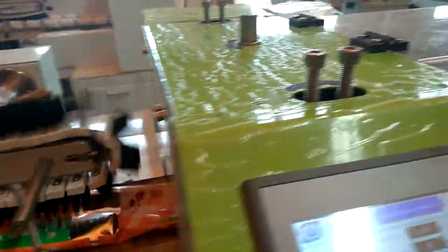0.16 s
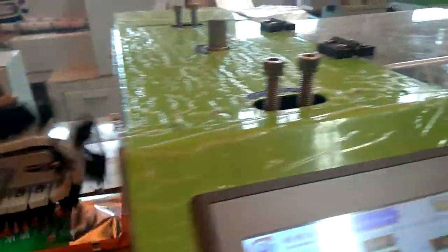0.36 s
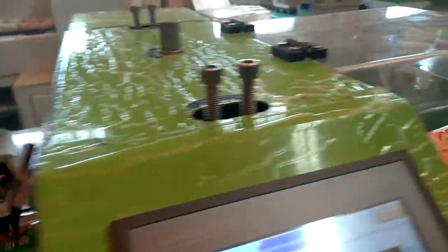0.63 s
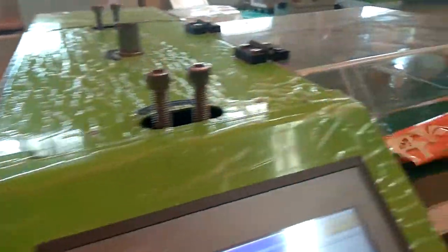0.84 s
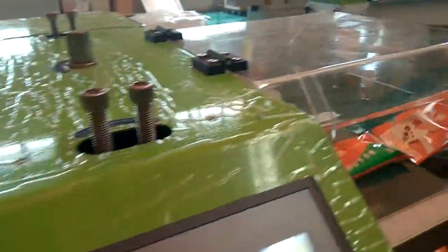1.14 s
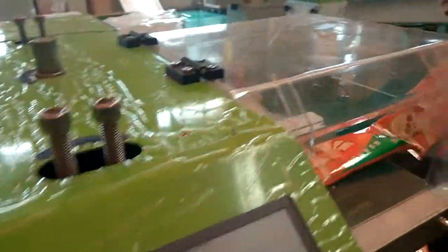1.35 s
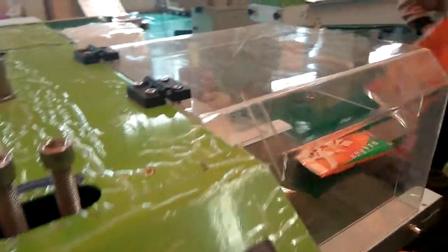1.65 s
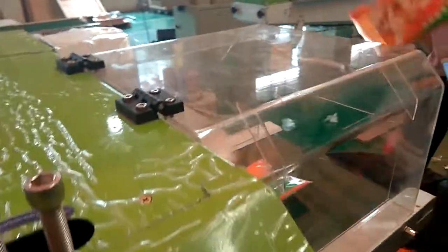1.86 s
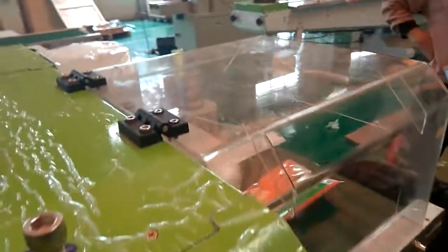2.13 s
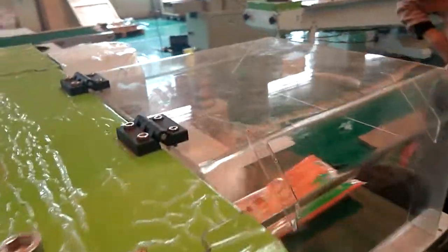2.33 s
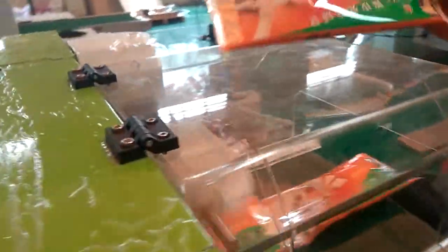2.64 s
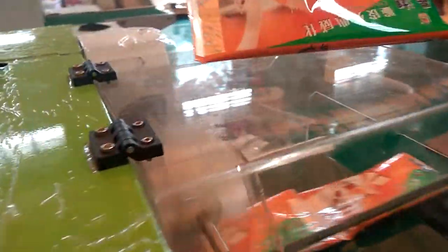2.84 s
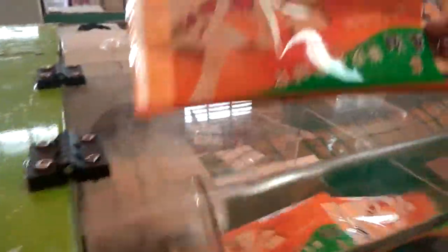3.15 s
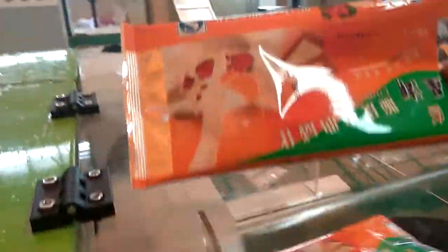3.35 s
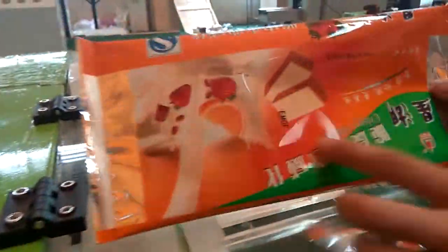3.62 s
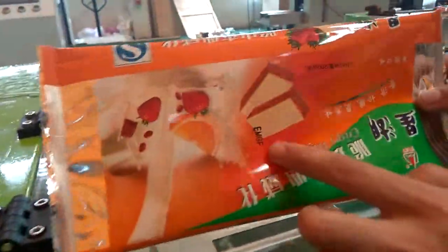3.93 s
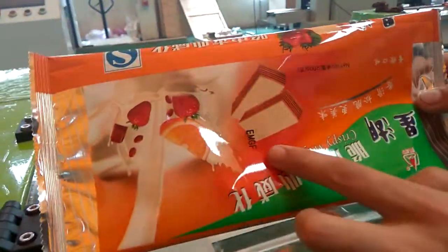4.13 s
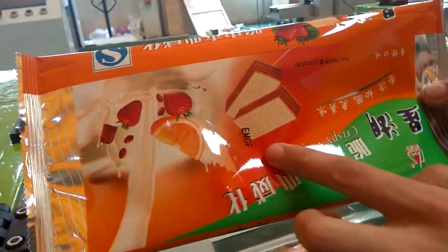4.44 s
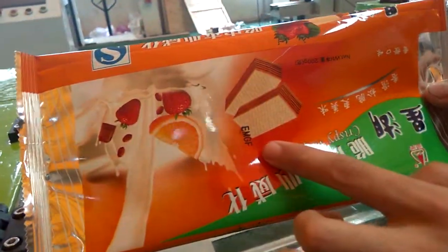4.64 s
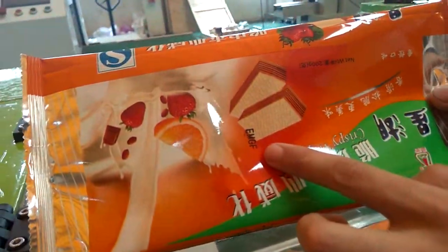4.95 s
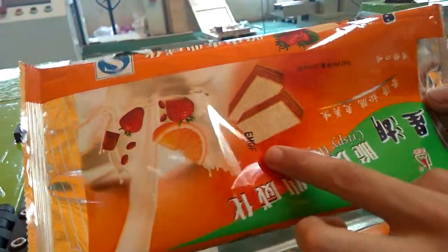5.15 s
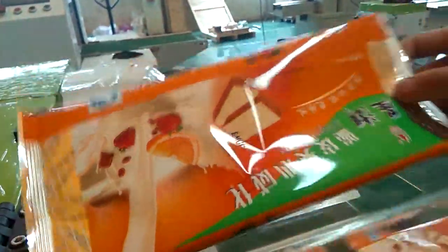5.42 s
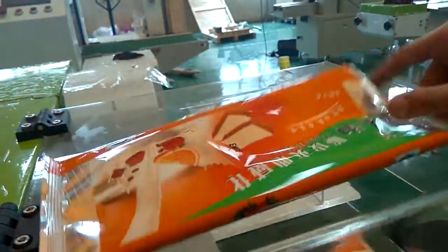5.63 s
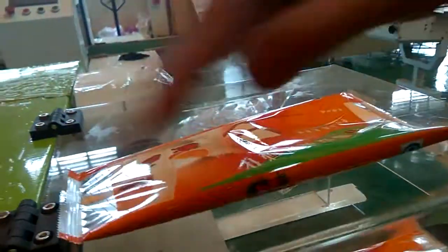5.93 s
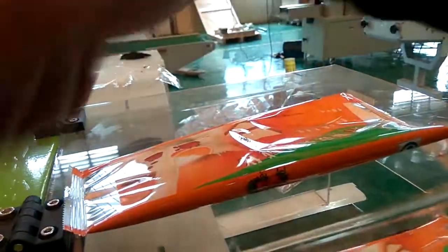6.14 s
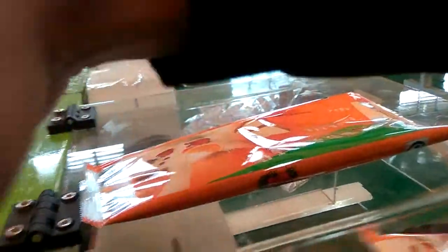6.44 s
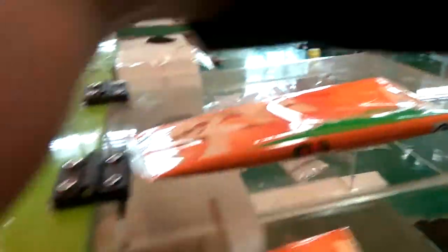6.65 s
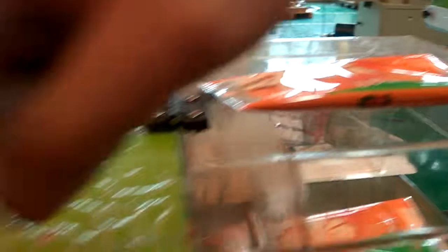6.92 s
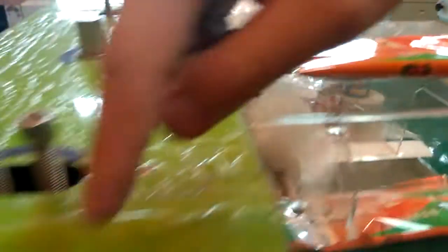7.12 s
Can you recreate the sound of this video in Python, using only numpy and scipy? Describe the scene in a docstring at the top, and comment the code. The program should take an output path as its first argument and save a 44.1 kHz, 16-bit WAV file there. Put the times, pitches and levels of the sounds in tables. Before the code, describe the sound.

A packaging machine runs throughout, close to a handheld stereo microphone in a reverberant factory hall. Jaw knocks, short and hollow with a brief grind, fall near 0.1, 1.3, 2.5, 3.7, 4.9 and 6.1 seconds. Each is followed about a tenth of a second later by a bright, scraping steel clack, strongest near 0.2, 1.4, 2.6, 3.8 and 6.2; further cam clatter fills every cycle. A low frame groan around 185 hertz wavers and flutters over rumble, briefly after the knock, then longer and stronger about half a second later. Chain links and film rustle constantly, ticking densely, busiest in the first second, thinner around 3 and 4, fuller again at the end. A loose plate rings thin rough notes, notably near 0.9, 4.5, 5.3, 5.8 and 6.9. Balance starts centred or slightly left, then mostly leans right. The machine is still running at the end.

```python
"""Packaging machine in a factory hall

A packaging machine runs close to a hand-held camera, one pack about every 1.2 s, nearer to the right microphone.
The drive makes the frame groan twice a cycle (wavering sines over low noise) and the chain rustles (patchy noise).
The jaws knock (noise and a pulse through resonances), cams and links clatter (scrapes and ringing steel modes),
a guide plate sings three rough notes, and the hall smears all the blows into a hiss (decaying noise)."""
import sys
import numpy as np
from scipy import signal
from scipy.fft import rfft, irfft, next_fast_len
from scipy.io import wavfile
from scipy.ndimage import uniform_filter1d, map_coordinates

SR = 44100
rng = np.random.default_rng(int(sys.argv[2]) if len(sys.argv) > 2 else 0)


def store_pcm(level_fs):
    """Save levels as 16-bit WAV."""
    pcm = np.round(np.clip(level_fs, -1, 1) * 32767).astype(np.int16)
    wavfile.write(sys.argv[1], SR, np.atleast_2d(pcm).T)


N = 321048
LAG = 19  # samples by which the treble, the knocks and the ringing steel come late on the left
LEFT_RIGHT = np.array([[.5], [-.5]])  # splits a left-right difference in dB between the two sides


def amp(db):
    """Turns decibels into a factor."""
    return 10 ** (np.asarray(db) / 20)


def unit(x):
    """Scales a sound to an average (RMS) level of one."""
    return x / np.sqrt(np.mean(x ** 2, axis=-1, keepdims=True) + 1e-20)


def along(points, hz):
    """Reads a curve of (Hz, value) points on a logarithmic frequency axis."""
    f, v = np.transpose(points)
    return np.interp(np.log(hz + 1), np.log(f + 1), v)


def curves(rows):
    """Gives one value per sample for each column after the time."""
    s, *cols = np.transpose(rows)
    return [np.interp(np.arange(N) / SR, s, c) for c in cols]


FIRST_S, PACK_S = .071, 1.199  # first jaw blow and length of a cycle, in seconds


def in_cycle(s):
    """Seconds since the last jaw blow."""
    return (s - FIRST_S) % PACK_S


def cycle(rows):
    """Like curves, for rows that repeat every cycle."""
    s, *cols = np.transpose(rows)
    return [np.interp(in_cycle(np.arange(N) / SR), s, c, period=PACK_S) for c in cols]


def wobble(rate):
    """Draws a smooth random curve through a given number of random points a second."""
    knots = rng.standard_normal(int(N * rate / SR) + 4)
    return map_coordinates(knots, [np.arange(N) * rate / SR])


def filtered(x, response):
    """Filters x by a complex response of frequency."""
    m = next_fast_len(x.shape[-1] + 2048)
    spectrum = rfft(x, m) * response(np.fft.rfftfreq(m, 1 / SR))
    return irfft(spectrum, m)[..., :x.shape[-1]]


# How much the two microphones hear the same thing.
# Each row: frequency in Hz, left-right likeness from 0 to 1.
ALIKE = [(30, 0.85), (150, 0.97), (300, 0.86), (600, 0.68), (1200, 0.53), (5000, 0.13)]


def pair(noise, colour_db, direct=1):
    """Turns two noises into a coloured left and right, partly alike, with the treble late on the left."""
    def mix(hz):
        likeness = np.clip(along(ALIKE, hz), 0, 1) ** direct  # direct below 1 makes the sides more alike
        angle = np.arccos(likeness) / 2
        return amp(colour_db(hz)) * np.array([np.cos(angle), np.sin(angle)])

    def late(hz):
        share = np.clip(hz / 900 - .6, 0, 1)  # no delay in the bass, the full delay in the treble
        return np.exp(-2j * np.pi * hz * LAG / SR * share)

    mid, side = np.moveaxis(filtered(noise, mix), -2, 0)
    return unit(np.stack([filtered(mid + side, late), mid - side], axis=-2))


def late_left(sound):
    """Plays one sound on both sides, the left one late."""
    return np.array([np.roll(sound, LAG), sound])


def add(track, s, sound):
    """Mixes a short sound into the track at s seconds."""
    part = track[..., round(s * SR):][..., :sound.shape[-1]]
    part += sound[..., :part.shape[-1]]


def ring(modes, t, extra_db):
    """Sums decaying modes, each with its own strength and a random phase."""
    hz, db, t60 = np.transpose(modes)[..., None]
    phase = rng.uniform(0, 2 * np.pi, hz.shape)
    return np.sum(amp(db + extra_db - 60 * t / t60) * np.sin(2 * np.pi * hz * t + phase), axis=0)


# The drive over one cycle, a short stroke and a long one; levels are before a fixed trim.
# Each row: seconds after the jaw blow, groan pitch in Hz, groan level in dB, casing rumble level in dB.
DRIVE = [(0, 187, -32, -35.5), (.03, 186.3, -23, -29.5), (.075, 180.7, -18, -30),
         (.145, 183.2, -20.5, -34.5), (.235, 189.2, -28, -35.5), (.36, 174.7, -41, -42.5),
         (.42, 181.6, -29, -35), (.475, 189, -25.5, -37), (.505, 184.1, -14.5, -27),
         (.555, 171.7, -15, -26), (.645, 186, -13, -29), (.70, 187.9, -18.5, -28),
         (.755, 188.8, -22.5, -34.5), (.80, 187.7, -34, -33.5), (.9, 174, -38.5, -38.5),
         (1.0, 186.3, -35.5, -37), (1.05, 178, -46.5, -40.5), (1.17, 185.6, -37, -39)]
# Two close frame modes beat, so the groan dips.
# Each row: seconds after the jaw blow, depth from 0 to 1.
DIPS = [(.115, 1), (0.201, 1), (.265, 0.9), (0.456, 0.5), (0.531, .6), (0.607, .75)]
DIP_S = .014  # seconds from the middle of a dip to about a third of its depth
# The colour of the casing rumble.
# Each row: frequency in Hz, relative level in dB.
CASING = [(15, -72.5), (25, -59), (54, -48.5), (79, -27), (135, -10.5), (179, 12), (249, -12.5),
          (323, -13.5), (405, -20), (544, -22.5), (706, -30.5), (812, -33), (1600, -36), (2080, -48.5),
          (3520, -120)]


def drive():
    """Gear teeth shake the frame: a wavering groan, every second tooth stronger, over casing rumble."""
    hz, groan_db, rumble_db = cycle(DRIVE)
    turn = 2 * np.pi * np.cumsum(hz + 6 * wobble(30)) / SR
    t = in_cycle(np.arange(N) / SR)
    beat = amp(1.53 * wobble(25))
    for s, depth in DIPS:
        beat = beat * (1 - depth * np.exp(-((t - s) / DIP_S) ** 2))
    second_tooth = amp(-21) * np.sin(turn / 2)
    uneven_teeth = amp(-18) * np.sin(1.7 * turn)
    groan = unit(beat * np.sin(turn) + second_tooth + uneven_teeth)

    def colour(f):
        gap_db = 20 * np.exp(-((f - 185) / 30) ** 2)  # leaves room for the groan
        return along(CASING, f) - gap_db

    rumble = pair(rng.standard_normal((2, N)), colour)
    rumble_level = amp(rumble_db + 3.5 + 1.83 * wobble(20))
    return amp(groan_db - 4.5) * groan + rumble_level * rumble


# The running noise of chain and film.
# Each row: time in seconds, level in dB before the load on the drive and a trim are added.
RUNNING = [(0.0, -36), (0.34, -33.5), (1.01, -37.5), (1.86, -37.5), (2.94, -43.5), (3.08, -38), (3.73, -35),
           (3.95, -45), (4.46, -39), (4.66, -41), (6.04, -37), (6.43, -40), (6.77, -38), (7.28, -32)]
RUNNING_FOLLOWS = 0.25  # dB of running noise per dB of casing rumble


def running_db():
    """The running noise swells a little with the load on the drive."""
    rumble_db = cycle(DRIVE)[-1]
    return curves(RUNNING)[0] + RUNNING_FOLLOWS * (rumble_db - rumble_db.mean())


# The balance as the camera turns; the rustle takes only part of the chain links' balance.
# Each row: time in seconds, left-right difference in dB of the cams, the same of the chain links,
# level in dB of the faint ticks over the running noise.
TURN = [(0, -3.5, 0, 7.5), (1.001, 1.5, -1.5, 6.5), (1.45, 0, -1, 16.5), (1.65, 10, 9, 9),
        (1.85, -2, 8, 7.5), (2.3, 8, 9.5, 8.5), (2.6, 0, 5, 12), (3.2, 3.5, 3.5, 2.5), (4.2, 2.5, 6.5, 3),
        (5.401, 3.5, 4.5, 10), (6.2, 2, 7, 4), (7.28, 3.5, 4, 1)]
# The colour of the chain rustle.
# Each row: frequency in Hz, relative level in dB.
CHAIN = [(530, 3), (900, 2), (1540, -4), (2670, 0), (3570, -3), (4530, -5.5), (5530, 0), (6820, -10.5),
         (7390, -26), (8000, -31.5), (8930, -26.5), (9480, -27), (9770, -53.5), (12700, -76.5),
         (21500, -120)]


def chain():
    """Links, rollers and film rustle: a patchy hiss that throbs with many small unseen ticks."""
    ticks = (rng.random(N) < 140 / SR) * rng.uniform(0, 1, N) ** 2  # about 140 a second
    tick_decay = amp(-60 * np.arange(1500) / SR / 0.065)
    throb = 1 + 0.5 * signal.fftconvolve(ticks, tick_decay)[:N]
    # brief ringing of small parts: patches of the spectrum swell and fade
    z = signal.stft(rng.standard_normal((2, N)), nperseg=256)[2]
    patches = uniform_filter1d(rng.standard_normal(z.shape[1:]), size=2, axis=0)
    patches = uniform_filter1d(patches, size=8, axis=1)
    noise = signal.istft(z * amp(3 * patches / patches.std()), nperseg=256)[1][:, :N]
    link_db = curves(TURN)[1]
    sway = amp(2.24 * wobble(14) + .4 * LEFT_RIGHT * link_db)
    rustle = pair(noise, lambda f: along(CHAIN, f))
    return amp(running_db() + 1.74) * sway * unit(throb) * rustle


# The jaw knocks.
# Each row: time in seconds, relative strength in dB, extra strength in dB of the fourth carrier mode, then of the fifth.
JAWS = [(0.071, -19, -25, -9), (1.27, -21.5, -9, -22), (2.468, -22.5, -5.5, -27.5), (3.669, -22, -11, -20),
        (4.867, -20, -32.5, -18), (6.065, -23, -20.5, -22)]
# The modes of the jaw carrier.
# Each row: frequency in Hz, width in Hz, relative strength in dB.
JAW = [(368, 32, -15), (531, 11.6, 4), (568, 7.8, 1), (822, 6.8, 17), (1110, 40, 19), (1100, 840, -8.5),
       (2240, 770, -7.5)]
OPEN_S, OPEN_LASTS_S = .41, .24  # the jaws part this long after the blow and rub for this long, in seconds
OPEN_DB = -31.5  # strength of the rub before it passes the carrier


def carrier(extra_db):
    """The jaw carrier passes force on through its modes, neighbours in opposite phase."""
    def response(f):
        total = 0
        for k, (c, wide, db) in enumerate(JAW):
            mode = 1j * f * wide / (c * c - f * f + 1j * f * wide + 1)
            total = total + (-1) ** k * amp(db + extra_db[k]) * mode
        return total
    return response


def jaws():
    """The jaws close once a cycle: the blow rings their carrier, they grind briefly and later part."""
    out, t = np.zeros(N), np.arange(SR // 3) / SR
    for s, db, fourth_db, fifth_db in JAWS:
        grind = amp(db + 6 - 34 * (t / 0.12) ** 4) * (1 - np.exp(-t / 0.0044)) * rng.standard_normal(len(t))
        blow = amp(db + 23.5) * np.exp(-((t - .002) / 0.00024) ** 2)
        rub_shape = np.sin(np.pi * np.clip(t / OPEN_LASTS_S, 0, 1)) ** .5
        rub = amp(OPEN_DB) * rub_shape * rng.standard_normal(len(t))
        add(out, s, filtered(grind + blow, carrier([0, 0, 0, fourth_db, fifth_db, 0, 0])))
        add(out, s + OPEN_S, filtered(rub, carrier([-12, 12, 3.5, -25, -27.5, -14, -16.5])))
    return late_left(out)


# The cams of one cycle.
# Each row: seconds after the jaw blow, rise in seconds, time to fall by 60 dB in seconds.
CAMS = [(.02, 0.011, 0.035), (.062, .006, 0.07), (.121, .0014, 0.045), (.42, 0.0074, 0.086),
        (.525, .009, 0.092), (.58, 0.0046, 0.058), (.79, 0.0039, 0.13), (.96, 0.0041, 0.095),
        (1.09, 0.0039, .08)]
# Cam blows on steel.
# Each row: time of the peak in seconds, level in dB before a small trim, brightest frequency in Hz.
BLOWS = [(0.0812, -19.5, 3470), (.131, -22, 2720), (0.1884, -12.5, 5350), (0.4732, -19.5, 3870),
         (0.6051, -16, 3390), (0.6511, -13.5, 5830), (0.8618, -14, 3770), (1.04, -20.5, 3900),
         (1.1862, -32, 3730), (1.2900, -29, 3040), (1.3299, -20, 4690), (1.3886, -10.5, 5430),
         (1.68, -26, 4300), (1.797, -16, 6900), (1.839, -17, 5760), (2.047, -17.5, 3910),
         (2.193, -28, 4030), (2.4926, -25, 4530), (2.529, -18, 4640), (2.5888, -12.5, 5500),
         (2.895, -26, 4500), (2.9908, -20.5, 2850), (3.0463, -18.5, 6000), (3.2629, -17.5, 4020),
         (3.452, -21, 6500), (3.562, -21, 3350), (3.684, -31.5, 5360), (3.7293, -21, 5050),
         (3.7881, -13.5, 5800), (4.09, -34, 4470), (4.1963, -21.5, 3250), (4.2522, -19, 3780),
         (4.4593, -22, 4100), (4.614, -23.5, 4820), (4.9025, -26.5, 2630), (4.929, -19, 4920),
         (4.991, -14.5, 5180), (5.2893, -24.5, 4800), (5.3919, -15, 6500), (5.451, -21.5, 5700),
         (5.6575, -16.5, 6500), (5.8024, -22, 5680), (5.965, -28.5, 3200), (6.0788, -26, 5430),
         (6.1301, -19.5, 4560), (6.1912, -12.5, 5430), (6.484, -27.5, 3990), (6.594, -19, 4120),
         (6.6554, -19, 4000), (6.8571, -18.5, 3650), (6.9889, -20, 4470), (7.1394, -19, 5330)]
# The loudest ticks of the chain links.
# Each row: time of the peak in seconds, level in dB before a small trim, brightest frequency in Hz.
TICKS = [(0.0946, -16.5, 2240), (0.104, -18, 3810), (0.1635, -27, 2280), (.2591, -20, 5300),
         (0.2904, -22.5, 3360), (.314, -20, 5170), (0.3556, -14, 5280), (0.412, -26, 4420),
         (.4414, -25, 6050), (0.5, -24, 3240), (0.541, -15.5, 6220), (0.5566, -14.5, 6370),
         (.682, -23.5, 5770), (0.704, -29, 5500), (.735, -28, 4650), (0.7638, -22.5, 3140),
         (0.8982, -16.5, 6250), (.9298, -20, 5530), (0.9627, -14.5, 5940), (1.016, -19.5, 3410),
         (1.0788, -21.5, 5100), (1.0947, -22.5, 2650), (1.252, -28, 4940), (1.3592, -25, 5270),
         (1.4225, -23.5, 2580), (1.4592, -26.5, 4520), (1.482, -25.5, 3747), (1.5085, -24, 2780),
         (1.5376, -29, 3000), (1.595, -20, 2430), (1.6218, -28.5, 4440), (1.6493, -31, 2530),
         (1.7056, -30, 3570), (1.733, -27, 2500), (1.765, -20.5, 5050), (1.8176, -21.5, 6630),
         (1.8708, -23, 4000), (1.9205, -23, 3100), (1.9653, -24, 5700), (2.0344, -25, 3830),
         (2.1183, -27, 3880), (2.1282, -25, 5200), (2.267, -21.5, 4980), (2.324, -26, 2840),
         (2.3416, -26.5, 4970), (2.3902, -28, 3760), (2.5637, -21.5, 2410), (2.6314, -21, 5700),
         (2.6938, -27, 5930), (2.7274, -28.5, 5970), (2.7552, -30, 6100), (3.105, -25, 4470),
         (3.1765, -25, 3730), (3.221, -22, 4670), (3.3305, -28, 5660), (3.42, -27, 6100),
         (3.749, -23, 5200), (3.853, -23, 5270), (3.9902, -25, 5700), (4.174, -24, 3060),
         (4.2872, -22, 5060), (4.3369, -22.5, 4980), (4.4916, -24, 5130), (4.5558, -19, 5100),
         (4.6715, -25.5, 5000), (5.091, -24, 4920), (5.1224, -25, 2850), (5.1482, -27.5, 5020),
         (5.2566, -31.5, 5400), (5.351, -22.5, 6500), (5.374, -23, 5470), (5.5367, -23, 5840),
         (5.5915, -24, 5940), (5.769, -29.5, 6140), (5.921, -25, 3100), (6.2738, -24.5, 4980),
         (6.558, -24.5, 3780), (6.7647, -24.5, 3990), (6.9295, -19.5, 3580), (6.9563, -23, 2830),
         (7.018, -27, 4400), (7.06, -20, 3390), (7.12, -24, 4660), (7.1748, -26.5, 2940),
         (7.2373, -21, 3550), (7.2588, -20, 5100)]
TICK_RISE_S, TICK_T60_S = .0013, 0.024  # rise and time to fall by 60 dB
LINK_S, FAINT_SPREAD_DB = .029, 3.5  # spacing of links; scatter of the faint ticks


def contact_rows():
    """Lists s, dB, Hz, rise s, fall s and left-right dB of cam blows, loud ticks and faint ticks between."""
    turn_s, cam_db, link_db, faint_db = np.transpose(TURN)
    s, db, hz = np.transpose(BLOWS)
    # each blow takes the rise and fall of the cam nearest in the cycle
    nearest = np.argmin(abs(in_cycle(s)[:, None] - np.transpose(CAMS)[0]), axis=1)
    cam = np.array(CAMS)[nearest]
    blows = np.c_[s, db, hz, cam[:, 1:], np.interp(s, turn_s, cam_db)]

    # faint ticks, one per link, each a little early or late
    chance = rng.standard_normal((round(N / SR / LINK_S), 3))
    s = LINK_S * (np.arange(len(chance)) + .5 + .25 * chance[:, 0])
    s = np.clip(s, 0, N / SR - .01)
    db = running_db()[(s * SR).astype(int)] + np.interp(s, turn_s, faint_db) + FAINT_SPREAD_DB * chance[:, 1]
    hz = np.clip(4100 * np.exp(.3 * chance[:, 2]), 2300, 6000)
    faint = np.c_[s, db, hz]
    # only those more than 18 ms from every listed contact sound
    listed_s = np.r_[blows[:, 0], np.transpose(TICKS)[0]]
    free = np.min(abs(s[:, None] - listed_s), axis=1) > .018

    ticks = np.r_[TICKS, faint[free]]
    shape = np.tile([TICK_RISE_S, TICK_T60_S], (len(ticks), 1))
    ticks = np.c_[ticks, shape, np.interp(ticks[:, 0], turn_s, link_db)]
    return np.r_[blows, ticks]


# The colour of the scrapes.
# Each row: frequency in Hz, relative level in dB.
CLACK = [(710, -21.5), (1200, -3.5), (1620, -13.5), (2510, -0.5), (3560, -2), (5720, -1), (6700, -4),
         (7310, -9), (7980, -21), (8790, -15.5), (9770, -41.5), (12700, -67), (21500, -120)]
# The ringing modes of guide and chain.
# Each row: frequency in Hz, relative level in dB, time to fall by 60 dB in seconds.
STEEL = [(2460, -17.5, 0.068), (3000, 2, .1), (3905, 8.5, 0.066), (4530, -2.5, 0.076), (5300, -3.5, .12),
         (5660, -24.5, 0.14), (6000, -5.5, .1), (6500, -29.5, .12), (7000, -13.5, 0.11)]


def contacts():
    """Each contact is a grainy scrape around its own pitch and rings the nearest steel modes most."""
    out, t = np.zeros((2, N)), np.arange(SR // 9) / SR
    s, db, hz, rise, t60, pan_db = np.transpose(contact_rows())[..., None, None]
    peaks = rng.standard_normal((len(s), 50))  # every part has its own small resonances, 200 Hz apart

    def near_db(f):
        return 8 * np.exp(-(np.log((f + 1) / hz) / 0.22) ** 2)

    def own_db(f):
        return 5.6 * np.array([np.interp(f, 200 * np.arange(50), row) for row in peaks])[:, None]

    noise = rng.standard_normal((len(s), 2, len(t)))
    scrape = pair(noise, lambda f: along(CLACK, f) + near_db(f) + own_db(f), direct=0.93)
    rebounds = uniform_filter1d(rng.standard_normal((len(s), 1, len(t))), size=90)  # 2 ms apart
    grain = amp(1.83 * unit(rebounds))
    lead = 1.5 * rise  # the contact builds up to its peak, then dies away
    build_up = np.sin(np.pi / 2 * t / lead) ** 2
    scrape = scrape * grain * np.where(t < lead, build_up, amp(-60 * (t - lead) / t60))
    chance_db = rng.normal(0, 3, (len(s), len(STEEL), 1))
    mode_db = near_db(np.transpose(STEEL)[0][:, None]) + chance_db - 23.5
    for k in range(len(s)):
        steel = ring(STEEL, t, mode_db[k]) * np.clip(t / lead[k, 0], 0, 1)
        steel = np.array([np.pad(steel, (LAG, 0))[:len(t)], steel])
        sides = amp(db[k] - 0.81 + LEFT_RIGHT * pan_db[k])
        start = max((s[k] - lead[k]).item(), 0)
        add(out, start, sides * (scrape[k] + steel))
    return out


# Blows on the guide plate.
# Each row: time in seconds, level in dB of the low note, of the middle note and of the high note.
PLATE = [(.08, -23, -52, -40), (0.862, -28, -22.5, -40), (1.678, -48, -30, -56), (2.045, -28, -46.5, -31),
         (2.89, -53, -34, -52), (3.26, -38, -35, -49), (4.09, -62, -39, -41), (4.46, -28, -36, -26),
         (5.288, -50, -23.5, -42), (5.801, -34, -32, -24.5), (6.49, -43, -28, -47), (6.65, -22, -45, -52),
         (6.86, -39, -30.5, -17), (6.99, -45, -29, -29)]
# The three notes of a loose guide plate.
# Each entry: frequency in Hz, around which the note wavers.
PLATE_HZ = [3890, 4390, 5250]
PLATE_T60_S = 0.2  # time to fall by 60 dB


def plate():
    """The guide plate sings three rough notes; where it is struck decides which."""
    strength, t = np.zeros((3, N)), np.arange(SR // 3) / SR
    for s, *note_db in PLATE:
        decay = amp(np.array(note_db)[:, None] - 60 * t / PLATE_T60_S)
        add(strength, s, decay * (1 - np.exp(-t / 0.0017)))
    notes = []
    for hz in PLATE_HZ:
        roughness = amp(4.3 * wobble(110))
        turn = 2 * np.pi * np.cumsum(hz + 20 * wobble(50)) / SR
        notes.append(roughness * np.sin(turn))
    return late_left(np.sum(strength * notes, axis=0))


# How fast the hall dies away.
# Each row: frequency in Hz, time to fall by 60 dB in seconds.
HALL = [(200, 0.1), (2000, 0.34), (8000, 0.088)]


def hall(x):
    """Each frequency of the hall's answer dies at its own speed, differently at each microphone."""
    hz, t, z = signal.stft(rng.standard_normal((2, SR // 2)), SR, nperseg=256)
    decay = amp(-60 * t / along(HALL, hz)[:, None])
    tail = signal.istft(z * decay, SR, nperseg=256)[1]
    delayed = np.pad(x, ((0, 0), (500, 0)))  # the answer starts about 11 ms late
    return signal.fftconvolve(delayed, tail / np.linalg.norm(tail[0]), axes=1)[:, :N]


def scene():
    """Adds the blows, their answer from the hall, the drive and the chain."""
    blows = contacts() + jaws() + plate()
    return blows + amp(-10) * hall(blows) + drive() + chain()


NOTCH_HZ, NOTCH_WIDE_HZ, NOTCH_DB = 8056, 345, -9.5  # a dip of the microphone ports
TOP_HZ = 9930  # nothing passes above this


def record(dry):
    """The camera rounds off sharp peaks, drops the deepest bass, dips in the treble and stops at its limit."""
    soft = dry / (1 + np.abs(dry / .62) ** 6) ** (1 / 6)

    def response(hz):
        dip = amp(NOTCH_DB * np.exp(-((hz - NOTCH_HZ) / NOTCH_WIDE_HZ) ** 2))
        bass_cut = 1 / np.sqrt(1 + (50 / (hz + 1)) ** 6)
        return (hz < TOP_HZ) * dip * bass_cut

    return filtered(soft, response)


dry = scene()
out = record(dry)
store_pcm(out)
```